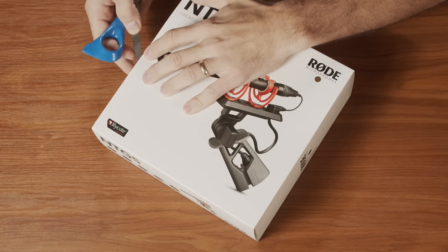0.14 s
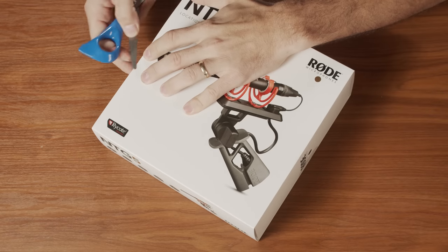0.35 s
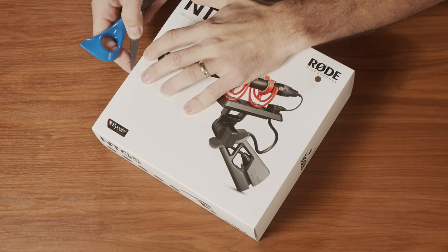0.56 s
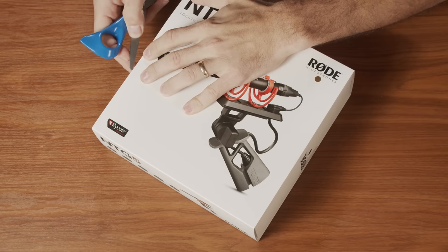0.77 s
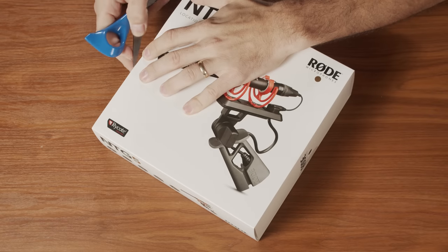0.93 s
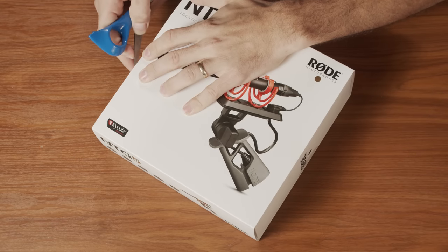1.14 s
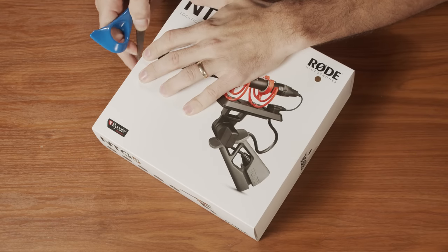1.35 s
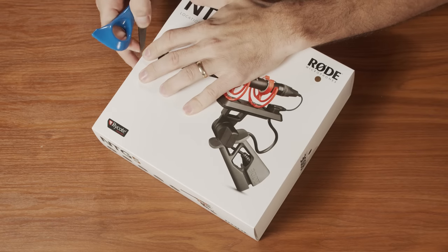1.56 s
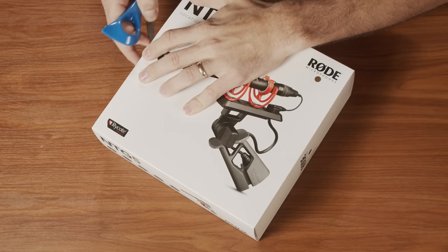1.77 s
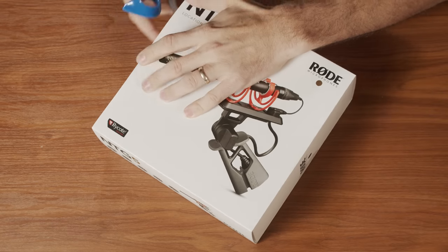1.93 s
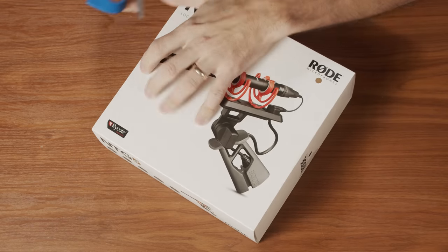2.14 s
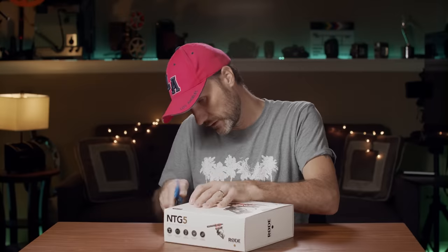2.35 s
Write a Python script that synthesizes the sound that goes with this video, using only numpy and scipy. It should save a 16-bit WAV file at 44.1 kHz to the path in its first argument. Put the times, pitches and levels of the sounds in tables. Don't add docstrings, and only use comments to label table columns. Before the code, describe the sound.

Close up in a small dry room with low hum, a blade pops through tape on a hollow box, thuds once, judders in a quick run of knocks, scrapes through card and snaps again before a hand brushes the lid.

```python
import sys
import numpy as np
from scipy import signal
from scipy.fft import rfft, irfft, next_fast_len
from scipy.io import wavfile
from scipy.ndimage import uniform_filter1d, map_coordinates

SR = 44100
rng = np.random.default_rng(int(sys.argv[2]) if len(sys.argv) > 2 else 0)


def voltage_ratio(level):
    return 10 ** (np.asarray(level, float) / 20)


def file_out(sig):
    cols = np.atleast_2d(sig).T
    lim = np.clip(cols, -1, 1)
    pcm = np.round(lim * 32767).astype(np.int16)
    wavfile.write(sys.argv[1], SR, pcm)


N = 105840

# t/s, peak level/dB, box boom over it/dB, upper blade modes over lower/dB, lowest mode f/Hz
TAPE_SNAPS = [(0.2768, -31.5, -6, -4, 710), (0.3999, -30.5, -14, -3.5, 1177),
              (0.527, -20, -12.5, 1.5, 1164), (0.6112, -29.5, -13, -1.5, 1824), (0.7262, -25, -8, 9, 1110),
              (0.8244, -39.5, -43, -4, 1540), (0.8599, -16, -12.5, -0.5, 1278),
              (0.9539, -43.5, -14, -11, 1660), (2.0427, -21.5, -10, 3.5, 1420),
              (2.0963, -27, -8.5, -0.5, 1106), (2.1846, -33.5, -16, -2, 716), (2.192, -59, -16, 0.5, 935)]
CRUNCH_AFTER_SNAP = [-18, -12, -12, -10, -4, -16, -14, -8, -19, -17, -18, -16]
SNAP_BRITTLENESS = [-6, -2, -3, -5, 3, -2, 1, 2, 10, 0.5, -13, 1]
# f/Hz, t60/s, level/dB
BLADE_MODES = [(1101, 0.0099, -9.5), (1609, 0.0074, -8), (2793, 0.0062, -3), (3420, 0.0063, -11),
               (4119, 0.005, -5), (5480, 0.0056, -13)]
# f/Hz, t60/s, level/dB
BOX_BOOM_MODES = [(179, 0.14, -17), (310.6, 0.055, 5), (417, 0.044, 0.5), (442, 0.12, -7.5),
                  (543.6, 0.054, -3.5), (860, 0.014, 7)]
# f/Hz, t60/s, level/dB
TABLE_MODES = [(135.7, 0.147, -5.5), (174, 0.077, 1), (186.5, 0.42, -14), (397, 0.16, -17)]
# t/s, peak level/dB
WALL_KNOCKS = [(.014, -42.5), (0.165, -37), (0.221, -38), (.235, -37.5), (0.996, -39.5), (1.3779, -21),
               (1.4122, -20.5), (1.4387, -20.5), (1.4613, -22), (1.4851, -27), (1.626, -34.5), (1.66, -38),
               (1.744, -32), (1.795, -31), (1.823, -28), (1.889, -32)]
# f/Hz, t60/s, level/dB
WALL_MODES = [(312, 0.06, -3), (380, 0.051, 1), (465, 0.048, -0.5), (520, 0.041, -9.5), (1380, 0.0094, -8),
              (2080, 0.012, -8), (2930, 0.0078, -23)]
# t/s, scrape level/dB, box rumble level/dB, blade singing re scrape/dB
SHORT_STROKES = [
    [(.13, -68, -70, -12), (.17, -61, -46.5, -15), (.2, -82, -79, -19), (.238, -49, -40.5, -19),
     (.275, -45.5, -44, -5.5), (.292, -61, -43.5, 0), (.33, -65, -89, 1)],
    [(.88, -86, -67, -12), (.96, -61, -57, -7), (1.06, -82, -63, 13)],
    [(1.26, -86, -60, -3), (1.32, -61.5, -56.5, -2), (1.4, -62, -46.5, 4.5), (1.5, -61, -49, -6),
     (1.58, -78, -74, 0)],
]
# t/s, scrape level/dB, box rumble level/dB, blade singing re scrape/dB
LONG_CUT = [(1.59, -80, -59, -9), (1.64, -57.5, -53.5, -3.5), (1.72, -63, -51.5, -1),
            (1.75, -49.5, -47.5, -1), (1.785, -48.5, -39.5, -3), (1.8, -36, -37.5, -9),
            (1.818, -49, -44, -4.5), (1.85, -50, -39.5, 13), (1.88, -39.5, -41.5, 3), (1.91, -36, -37, 0),
            (1.94, -37.5, -42.5, -11), (1.97, -37, -38.5, -7.5), (2.01, -36.5, -43, -7),
            (2.035, -44.5, -47.5, -26), (2.07, -48, -56, -20), (2.11, -53, -51, -17), (2.14, -98, -74, -14)]
# t/s, hiss level/dB, box rumble level/dB
HAND_SLIDE = [(2.13, -73, -70), (2.17, -58, -62), (2.21, -55, -62), (2.26, -53.5, -68), (2.3, -57.5, -60.5),
              (2.33, -56, -51.5), (2.4, -52, -64.5)]
# f/Hz, width/Hz, level/dB
SCRAPED_BLADE = [(1550, 250, -7), (2640, 300, 0), (3330, 250, -10), (4350, 300, -10)]
# f/Hz, width/Hz, level/dB
SCRAPED_BOX = [(174, 22, -10), (287, 26.4, 1), (387.3, 42, 4), (437.3, 36.6, -4), (504, 42, -3.5),
               (844, 450, -14), (1272, 224, -10)]
# f/Hz, level per Hz/dB
CARD_SPECTRUM = [(500, -23), (900, -13.5), (2600, 5), (4400, 1.5), (6200, -9), (8500, -28.5), (11300, -27),
                 (16000, -43)]
# f/Hz, level per Hz/dB
SKIN_SPECTRUM = [(500, -20), (1300, -2), (2000, -12), (3300, -3.5), (6000, -13.5), (7800, -30),
                 (11000, -31), (16000, -37)]
# f/Hz, t60/s
ROOM_DECAY = [(200, 0.27), (2000, 0.15), (6000, 0.16), (12000, 0.18)]
# f/Hz, level per Hz/dB
AIR_SPECTRUM = [(20, 0), (195, -2.5), (430, -8.5), (1000, -17), (3000, -20), (5000, -25), (7200, -40),
                (16000, -73)]


def snaps():
    rise_s, fall_s, boom_lag_s, crunch_t60_s = 0.001681, 0.001, 0.002066, 0.057
    steel_db, fibre_db, crunch_gain_db, boom_gain_db = 3, -7.5, 4, 7.5
    out = np.zeros(N)
    t = np.arange(SR // 5) / SR
    tear = t / rise_s * np.exp(-np.maximum(t - rise_s, 0) / fall_s)
    crunch = patchy(grains(), CARD_SPECTRUM)
    for snap, crunch_db, brittle_db in zip(TAPE_SNAPS, CRUNCH_AFTER_SNAP, SNAP_BRITTLENESS):
        s, db, boom_db, bright_db, low_hz = snap
        modes = [(low_hz, *BLADE_MODES[0][1:])]
        modes += [(hz, t60, level + bright_db * (hz > 2000)) for hz, t60, level in BLADE_MODES[1:]]
        steel = ring(modes, t, rise_s, 1)
        fibres = tear * rng.standard_normal(len(t))
        tearing_on = voltage_ratio(-60 * t / crunch_t60_s) * crunch[round(s * SR):][:len(t)]
        boom = ring(BOX_BOOM_MODES, t, 0.0012, 0.74)
        add(out, s - rise_s, steel, db + steel_db)
        add(out, s - rise_s, fibres, db + brittle_db + fibre_db)
        add(out, s, tearing_on, db + crunch_db + crunch_gain_db)
        add(out, s + boom_lag_s, boom, db + boom_db + boom_gain_db)
    return filtered(out, dull)


def thud():
    out = np.zeros(N)
    t = np.arange(SR // 5) / SR
    add(out, 0.866, ring(TABLE_MODES, t, 0.0043, 0), TAPE_SNAPS[6][1] - 14.5)
    return filtered(out, dull)


def scrape():
    scrape_db, rumble_db = -4, 2
    strokes = SHORT_STROKES + [LONG_CUT]
    rasp, rumble, _ = gains(strokes)
    singing = [[(s, db + over) for s, db, _, over in rows] for rows in strokes]
    sing = gains(singing)[0]
    card = patchy(grains(), CARD_SPECTRUM)
    steel = unit(filtered(grains(), lambda f: body(SCRAPED_BLADE)(f) ** 2))
    hiss, lid = gains([HAND_SLIDE])
    skin = patchy(grains(), SKIN_SPECTRUM)
    box = unit(filtered(grains(), body(SCRAPED_BOX)))
    blade = voltage_ratio(scrape_db) * (rasp * card + sing * steel)
    return blade + hiss * skin + voltage_ratio(rumble_db) * (rumble + lid) * box


def knocks():
    push_s = 0.002354
    out = np.zeros(N)
    t = np.arange(SR // 8) / SR
    swell = 1 - np.exp(-(t / push_s) ** 2)
    for s, db in WALL_KNOCKS:
        wall = np.zeros(len(t))
        for hz, t60, level in WALL_MODES:
            decay = voltage_ratio(level + rng.normal(0, 0.8) - 60 * t / t60)
            wall += decay * np.cos(2 * np.pi * hz * (t - push_s))
        add(out, s, swell * wall, db - 1)
    return out


def grains():
    grains_per_s, spread_db, judder_db = 9000, 3, 0.7
    hit = rng.random(N) < grains_per_s / SR
    size_db = np.minimum(spread_db * rng.exponential(size=N), 4 * spread_db)
    return hit * voltage_ratio(size_db + judder_db * wobble(50)) * rng.choice([-1, 1], N)


def ring(modes, t, rise_s, vary_db):
    total = np.zeros(len(t))
    for hz, t60, db in modes:
        decay = voltage_ratio(db + vary_db * rng.standard_normal() - 60 * t / t60)
        total += decay * np.sin(2 * np.pi * (hz * t + rng.random()))
    return (1 - np.exp(-(t / rise_s) ** 2)) * total


def body(peaks):
    def response(f):
        total = 0
        for k, (hz, width, db) in enumerate(peaks):
            total = total + (-1) ** k * voltage_ratio(db) * 1j * f * width / (hz ** 2 - f * f + 1j * f * width)
        return total
    return response


def dull(f):
    corner_hz = 5720
    return (corner_hz / (corner_hz + 1j * f)) ** 3


def patchy(x, spectrum):
    z = signal.stft(x, nperseg=256)[2]
    field = uniform_filter1d(rng.standard_normal(z.shape), 3, 0)
    field = uniform_filter1d(field, 12, 1)
    x = signal.istft(z * voltage_ratio(2 * unit(field)), nperseg=256)[1][:N]
    return unit(filtered(x, lambda f: voltage_ratio(along(spectrum, f))))


def gains(tables):
    t = np.arange(N) / SR
    total = 0
    for s, *columns in map(np.transpose, tables):
        total = total + np.array([voltage_ratio(np.interp(t, s, db, -120, -120)) for db in columns])
    return total


def wobble(rate):
    knots = rng.standard_normal(int(N * rate / SR) + 4)
    return map_coordinates(knots, [np.arange(N) * rate / SR])


def unit(x):
    return x / np.sqrt(np.mean(x ** 2) + 1e-20)


def along(points, hz):
    f, v = np.transpose(points)
    return np.interp(np.log(hz + 1), np.log(f + 1), v)


def filtered(x, response):
    m = next_fast_len(len(x) + SR // 4)
    return irfft(rfft(x, m) * response(np.fft.rfftfreq(m, 1 / SR)), m)[:len(x)]


def add(track, s, sound, db):
    part = track[max(round(s * SR), 0):][:len(sound)]
    part += voltage_ratio(db) * sound[:len(part)] / np.abs(sound).max()


def room(x):
    first_wall_s = 0.005
    hz, t, z = signal.stft(rng.standard_normal(SR // 2), SR, nperseg=256)
    decay = voltage_ratio(-60 * t / along(ROOM_DECAY, hz)[:, None])
    tail = signal.istft(z * decay, SR, nperseg=256)[1]
    delayed = np.pad(x, (round(first_wall_s * SR), 0))
    return signal.fftconvolve(delayed, tail / np.linalg.norm(tail))[:N]


def hum():
    air_db, drone_db, drone_hz = -55, -61.5, 119.3
    air = unit(filtered(rng.standard_normal(N), lambda f: voltage_ratio(along(AIR_SPECTRUM, f))))
    drone = unit(filtered(rng.standard_normal(N), lambda f: body([(drone_hz, 25, 0)])(f) ** 2))
    return voltage_ratio(air_db + 0.45 * wobble(6.4)) * air + voltage_ratio(drone_db) * drone


def scene():
    room_db, hop_s = -11, 0.15
    direct = snaps() + thud() + scrape() + knocks()
    t = np.arange(N) / SR
    answer = np.zeros(N)
    for k in range(17):
        fade = np.clip(1 - abs(t - k * hop_s) / hop_s, 0, 1)
        answer += room(direct * fade)
    return (direct + voltage_ratio(room_db) * answer + hum())[None]


def low_pass(x):
    return signal.sosfilt(signal.butter(12, 16340, fs=SR, output="sos"), x)


def record(dry):
    hiss_db = -80.5
    mix = dry + voltage_ratio(hiss_db) * rng.standard_normal(dry.shape)
    return low_pass(mix)


dry = scene()
out = record(dry)
file_out(out)
```